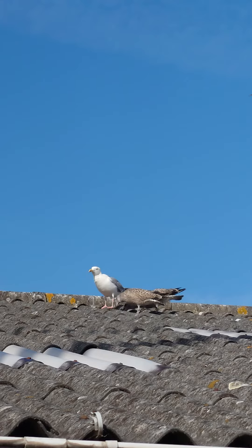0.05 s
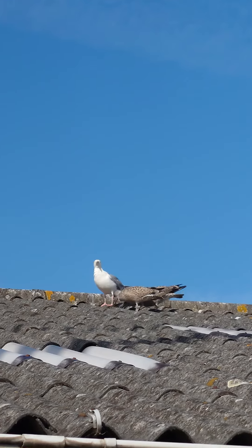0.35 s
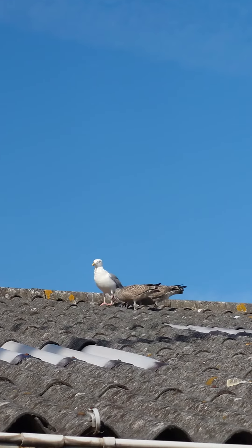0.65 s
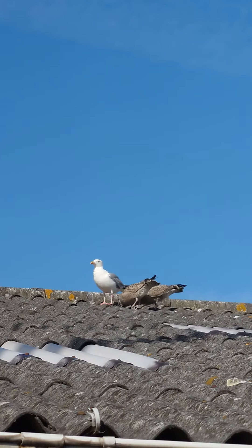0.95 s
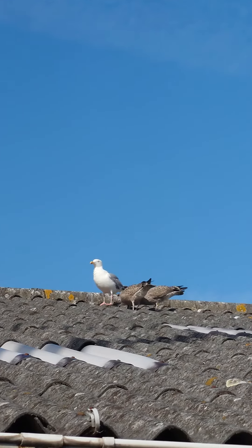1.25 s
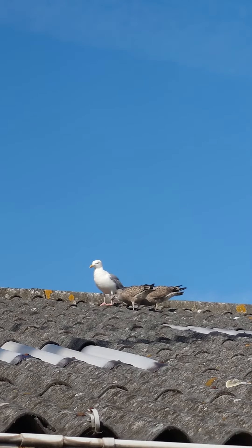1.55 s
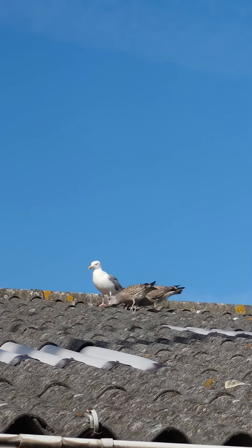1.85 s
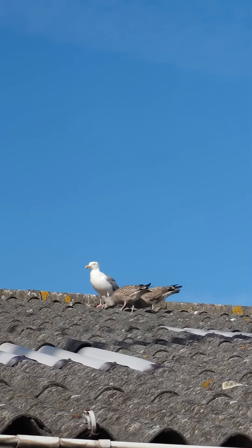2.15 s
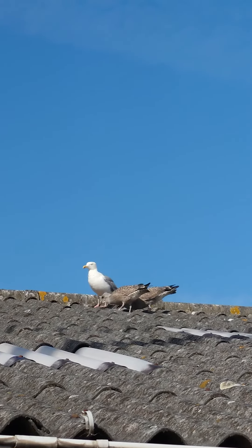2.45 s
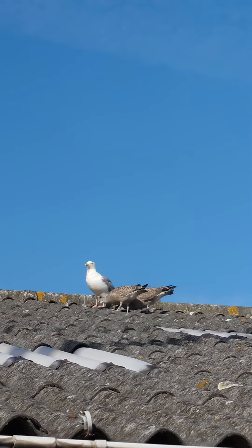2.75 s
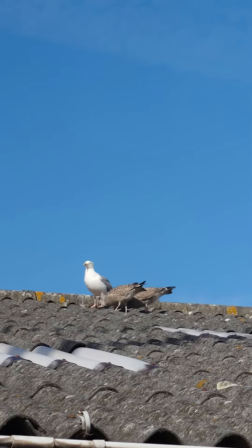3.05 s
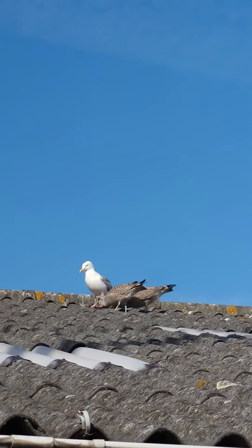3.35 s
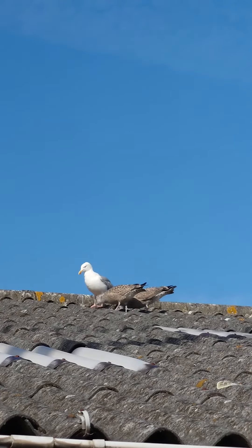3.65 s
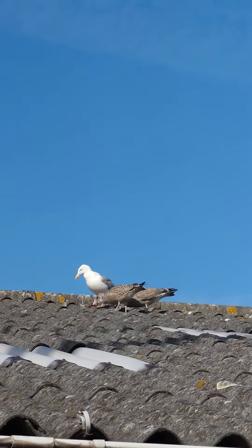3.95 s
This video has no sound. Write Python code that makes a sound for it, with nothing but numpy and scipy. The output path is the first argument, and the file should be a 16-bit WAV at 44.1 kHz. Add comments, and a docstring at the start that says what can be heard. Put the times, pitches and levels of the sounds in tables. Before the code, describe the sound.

Two young gulls beg with short, falling mews and squeals, often overlapping, over faint wind.

```python
"""Two young gulls beg on a roof, taking turns and often overlapping: one mews, one squeals, then wails.
Each call is a harmonic voice shaped by throat and beak: it rasps in, leaps to a clear note that
slides down, and breaks to a lower register. A smaller chick whistles far off.
Nearby houses throw the calls back; a light wind rumbles on the microphone over a faint hiss of air."""
import sys
import numpy as np
from scipy import signal
from scipy.fft import rfft, irfft
from scipy.io import wavfile
from scipy.ndimage import uniform_filter1d

SR = 44100
rng = np.random.default_rng(int(sys.argv[2]) if len(sys.argv) > 2 else 0)


def pcm_store(signal):
    """Save signal as 16-bit PCM."""
    levels = np.round(np.clip(np.atleast_2d(signal), -1, 1) * 32767)
    wavfile.write(sys.argv[1], SR, levels.astype(np.int16).T)


N = 176400

# Throat and beak response: freq_hz, gain_db
THROAT = [(180, -25.5), (400, -8.5), (650, -12.5), (900, -1), (1380, -2.5), (1750, -13), (2250, -17),
          (2800, -11), (3050, -7.5), (3400, -6), (4050, -9), (4500, -11), (5200, -18), (6400, -24.5),
          (7100, -42.5), (8000, -34.5), (9200, -56.5), (10200, -43), (11500, -49), (12600, -49),
          (15500, -58.5)]
BAND_LIMIT_HZ, ECHO_DULL_HZ = 15700, 1850


def gull_call(contour, gape, beak, start_s, leap_s, break_s, end_s, level_db, bright_db,
              treble_db=0, pitch_ratio=1, hold_s=0, slide_depth=1):
    """Harmonic voice through throat and beak; rasp adds jitter, half tones and puffs of air."""
    t = np.arange(start_s, end_s, 1 / SR)
    size = len(t)
    # Stage 0-1: wind-up, 1-2: clear note, 2-3: lower register.
    stage_times_s = [start_s, leap_s, leap_s + .002, leap_s + .003 + hold_s, break_s, end_s]
    stage = np.interp(t, stage_times_s, [0, 1, 1.02, 1.05, 2, 3])
    knots, *columns = np.transpose(contour)
    hz, envelope_db, overtone_db, rasp = (np.interp(stage, knots, column) for column in columns)
    overtone_db += bright_db
    # The top harmonics get out best while the beak is wide.
    open_stage, close_stage, open_db, scatter_rad = gape
    shut = np.clip(.5 + np.maximum(open_stage - stage, stage - close_stage) / .23, 0, 1)
    top_db = open_db + treble_db - 8.5 * shut
    slide = np.where((stage > 1) & (stage < 2), slide_depth, 1)
    hz = pitch_ratio * hz.max() * (hz / hz.max()) ** slide
    hz *= 1 + (.0014 + .022 * rasp) * waver(size, hz=263.1)
    phase = 2 * np.pi * np.cumsum(hz) / SR
    voice = np.zeros(size)
    for k in [.5, 1.5, 2.5, 3.5, 4.5, *range(1, 14)]:
        partial_hz = k * hz
        weight = amp(-10) * rasp if k % 1 else np.sqrt(1 - rasp ** 2)
        lift = (max(k - 1, 0) / 2) ** .34
        treble = 1 / (1 + (6140 / partial_hz) ** 10)
        beak_db = sum(db * np.exp(-((partial_hz - centre_hz) / 394) ** 2) for centre_hz, db in beak)
        lift_db = (overtone_db + 1.5 * waver(size, hz=60)) * lift
        gain = amp(read(THROAT, partial_hz) + beak_db + lift_db + top_db * treble)
        gain *= partial_hz < BAND_LIMIT_HZ
        hiss_rad = scatter_rad * treble ** 2 * waver(size, hz=400)
        voice += weight * gain * np.sqrt(2) * np.sin(k * phase + hiss_rad)
    breath = amp(-5) * rasp * air_puffs(size, overtone_db)
    fade = np.clip(np.minimum(t - start_s, end_s - t) / .0044, 0, 1)
    shimmer_db = 2 * waver(size, hz=69.3)
    sound = fade * amp(envelope_db + shimmer_db) * (voice + breath)
    add(sound, 0, creak())
    return amp(level_db) * sound


def mews():
    """First gull: each mew ends in two voices, the second sliding on down."""
    # stage, pitch_hz, level_db, overtone_db, rasp_share
    contour = [(0, 877.4, -12.5, -26, 0.81), (.5, 932.7, -9.5, -6, 0.96), (.95, 1050, -1.5, -15.5, 0.23),
               (1, 1325, -1.5, 2.5, 0.28), (1.17, 1401, 1, -0.5, 0.01), (1.32, 1316, -0.5, 3.5, 0.04),
               (1.58, 1252, -2, -1.5, 0.03), (1.85, 1217, -1.5, -6.5, 0.07), (1.98, 1191, -9, -8, 0.3),
               (2.04, 930, -4, -5.5, 0.5), (2.4, 864, -3, -18, 0.34), (3, 665, -15.5, -20.5, 0)]
    # open_stage, close_stage, treble_db, scatter_rad
    gape = (1.43, 1.75, -2.3, .2)
    # Beak peaks and dips: centre_hz, gain_db
    beak = [(2400, -6.5), (4800, 4.5), (5550, -6.5)]
    # start_s, leap_s, break_s, end_s, level_db, bright_db, treble_db, pitch_ratio
    calls = [(-.01, 0.032, .19, .212, -32.5, 4, -7, 1.004), (0.509, 0.545, 0.72, .74, -31, -1.5, 1.5, 0.98),
             (1.057, 1.099, 1.243, 1.282, -31.5, 2, -3, .995), (1.583, 1.629, 1.763, 1.805, -33, 1, -7, 1),
             (2.104, 2.142, 2.286, 2.331, -33, 2, -1, 1), (2.664, 2.703, 2.846, 2.885, -33.5, 2, 1, .995),
             (3.191, 3.227, 3.413, 3.413, -33.5, 2, 1, 0.99),
             (3.678, 3.713, 3.88, 3.885, -33.5, 4.5, 2.5, 1.011)]
    # delay_s, length_s, first_hz, middle_hz, last_hz, relative_db
    second_voice = (.005, .042, 1230, 1120, 820, -10)
    delay_s, *glide, relative_db = second_voice
    mix = np.zeros(N)
    for row in calls:
        start_s, _, break_s, _, level_db, *_ = row
        add(mix, start_s, gull_call(contour, gape, beak, *row))
        add(mix, break_s + delay_s, whistle(*glide, level_db + relative_db))
    return mix


def squeals():
    """Second gull, first calls: aimed at houses farther off, they come back late and dull."""
    # stage, pitch_hz, level_db, overtone_db, rasp_share
    contour = [(0, 836.8, -22, 2, .95), (.25, 1099, -12, -0.5, .9), (.35, 1202, -7, 0.5, .17),
               (.88, 1290, 2, -17.5, .02), (.97, 1342, -4, -16, .09), (1.05, 1458, -2.5, 0, .04),
               (1.95, 1335, 3, -13, 0.03), (2.03, 1171, 0.5, -2, .04), (2.4, 1121, 0, 2.5, .04),
               (2.8, 1050, -4.5, -0.5, .14), (3, 937, -15, 4.5, .45)]
    # open_stage, close_stage, treble_db, scatter_rad
    gape = (2.39, 3, 1.8, 0.81)
    # Beak peaks and dips: centre_hz, gain_db
    beak = [(2250, 3.5), (5750, -8.5), (6850, -22)]
    # start_s, leap_s, break_s, end_s, level_db, bright_db
    calls = [(-.07, 0.014, 0.034, 0.1, -26, 0), (0.208, 0.302, 0.32, 0.41, -26.5, 1),
             (.595, 0.649, .686, .763, -25.5, -0.5)]
    # delay_s, gain_db
    far_echoes = [(.6, -14), (.775, -25.5)]
    mix = np.zeros(N)
    for row in calls:
        add(mix, row[0], gull_call(contour, gape, beak, *row))
    dulled = signal.lfilter(*signal.butter(2, ECHO_DULL_HZ, fs=SR), mix)
    for delay_s, gain_db in far_echoes:
        add(mix, delay_s, amp(gain_db) * dulled)
    return mix


def wails():
    """Second gull, later calls: a briefly held top note, then a long slide."""
    # stage, pitch_hz, level_db, overtone_db, rasp_share
    contour = [(0, 894, -18.5, -8.5, 1), (.42, 1076, -6, -6.5, 1), (.53, 1193, -8.5, -2.5, 0.53),
               (.83, 1279, 3.5, -5, 0.055), (.97, 1315, -4.5, -22.5, 0.096), (1.02, 1476, -4.5, -5, 0.2),
               (1.18, 1386, 2, -6.5, 0.096), (1.35, 1269, 1, -2, 0.052), (1.57, 1190, -6, -0.5, 0.038),
               (1.8, 1120, -7, -4, 0.041), (1.98, 1081, -6, -21, 0.11), (2.07, 892.5, -6.5, -9, 0.38),
               (2.55, 808.4, -8, -40.5, 0.42), (3, 668, -16.5, -13, 1)]
    # open_stage, close_stage, treble_db, scatter_rad
    gape = (1.4, 1.75, 3, 1)
    # Beak peaks and dips: centre_hz, gain_db
    beak = [(2950, -2.5), (4400, -4.5), (6100, 0.5)]
    # start_s, leap_s, break_s, end_s, level_db, bright_db, hold_s, slide_depth
    calls = [(0.965, 1.021, 1.16, 1.21, -28, 0.5, .019, 0.94),
             (1.847, 1.897, 2.01, 2.08, -28, -.5, 0.0096, 0.98),
             (2.467, 2.528, 2.668, 2.725, -30, 0.5, 0.0018, 0.94),
             (3.327, 3.38, 3.494, 3.57, -31.5, -0.5, 0.0019, 0.97)]
    mix = np.zeros(N)
    for *row, hold_s, depth in calls:
        add(mix, row[0], gull_call(contour, gape, beak, *row, hold_s=hold_s, slide_depth=depth))
    return mix


def air_puffs(size, fizz_db, rattle_hz=370.2, split_hz=1750, top_hz=7000):
    """Rattling puffs of air coloured by the throat: a low body plus fizz."""
    cycles = np.cumsum(rattle_hz * (1 + .18 * waver(size, hz=100))) / SR
    puffs = evened((.14 + np.exp(-(cycles % 1) / .43)) * rng.standard_normal(size))
    fft_size = 16384
    hz = np.fft.rfftfreq(fft_size, 1 / SR)
    throat = evened(amp(read(THROAT, hz)) / np.hypot(1, (hz / top_hz) ** 3))
    spectrum = rfft(puffs, fft_size) * throat
    body = irfft(spectrum * (hz < split_hz))[:size]
    fizz = irfft(spectrum * (hz >= split_hz))[:size]
    return body + amp(fizz_db) * fizz


def creak(length_s=.028, snap_hz=342.4, band_hz=(1130, 5960)):
    """A short swelling run of sharp snaps as the voice catches."""
    t = np.arange(0, length_s, 1 / SR)
    cycles = np.cumsum(snap_hz * (1 + .22 * waver(len(t), snap_hz))) / SR
    swell = np.sin(np.pi * (t / length_s) ** 1.9) ** .5
    snaps = np.diff(np.floor(cycles), prepend=0) * swell
    band = signal.butter(4, band_hz, "bandpass", fs=SR, output="sos")
    lowpass = signal.butter(10, band_hz[1], fs=SR, output="sos")
    return amp(-25.5) * evened(signal.sosfilt(np.vstack([band, lowpass]), snaps))


def whistle(length_s, first_hz, middle_hz, last_hz, level_db):
    """A thin, slightly unsteady tone gliding through three pitches."""
    t = np.arange(0, length_s, 1 / SR)
    glide = np.polyfit([0, .5, 1], [first_hz, middle_hz, last_hz], 2)
    hz = np.polyval(glide, t / length_s) * (1 + .0055 * waver(len(t), hz=110))
    fade = np.clip(np.minimum(t, length_s - t) / .0028, 0, 1)
    shimmer_db = 4.7 * waver(len(t), hz=58)
    return amp(level_db + shimmer_db) * fade * np.sin(2 * np.pi * np.cumsum(hz) / SR)


def chick():
    """A distant chick's short, high whistles."""
    # start_s, length_s, first_hz, middle_hz, last_hz, level_db
    whistles = [(0.507, 0.047, 4522, 4600, 4620, -44.5), (1.429, 0.15, 4588, 4470, 4670, -55),
                (2.727, .12, 4820, 4670, 4710, -51.5), (3.807, 0.17, 4543, 4780, 4450, -54)]
    mix = np.zeros(N)
    for start_s, *row in whistles:
        add(mix, start_s, whistle(*row))
    return mix


def wall_echoes(t):
    """Stereo impulse response of the houses: each echo is a spike and a short smear."""
    # delay_s, gain_db
    echoes = [(.014, -9.5), (.031, -17), (.087, -17), (0.119, -16), (0.243, -29.5)]
    smear_s, skew_s = .002, .0008
    walls = np.zeros((2, len(t)))
    for delay_s, gain_db in echoes:
        smear = rng.standard_normal(walls.shape) * np.exp(-abs(t - delay_s) / smear_s) * (t > delay_s)
        walls += amp(gain_db) * smear / np.linalg.norm(smear[0])
        for channel in walls:
            add(channel, delay_s + skew_s * rng.uniform(-1, 1), amp([gain_db]))
    return walls


def diffuse_tail(size, rise_s=.0097):
    """Stereo impulse response of the yard: noise dying away band by band."""
    # freq_hz, t60_s, level_db
    yard = [(394, 0.85, -9), (1230, 1, -14), (2670, 1, -9), (4050, 0.98, -16), (6500, 0.78, -10),
            (13000, .35, -10.5)]
    hz, age_s, noise = signal.stft(rng.standard_normal((2, size)), SR, nperseg=256)
    decay = amp(-60 * age_s / read(yard, hz)[:, None]) * np.minimum(age_s / rise_s, 1)
    decay /= np.sqrt((decay ** 2).mean(1, keepdims=True) * size)
    gain = amp(read(yard, hz, column=2))[:, None]
    return signal.istft(noise * decay * gain, SR, nperseg=256)[1][:, :size]


def outdoors(birds):
    """Direct sound from the right, dulled wall echoes and a diffuse tail."""
    # freq_hz, left_minus_right_db, left_lead_rad
    direction = [(500, 3, -0.2), (1200, 0.5, -1.2), (2570, -16, -1.5), (3410, -8.5, 2.5), (3788, -2, -2),
                 (4930, -15.5, -2), (6500, -28, -8), (7560, -8, -1.87)]
    size, lead = SR, 256
    hz, t = np.fft.rfftfreq(size, 1 / SR), np.arange(size) / SR
    side = np.array([[.5], [-.5]])
    balance = amp(side * read(direction, hz))
    balance /= np.sqrt((balance ** 2).mean(0))
    direct = balance * np.exp(1j * side * read(direction, hz, column=2))
    walls = rfft(wall_echoes(t)) / np.hypot(1, hz / ECHO_DULL_HZ)
    response = direct + balance ** .5 * (walls + rfft(diffuse_tail(size)))
    impulse = np.roll(irfft(response, size), lead, 1)
    return signal.fftconvolve(birds[None], impulse, axes=1)[:, lead:lead + N]


def wind():
    """Light gusts rumbling on the microphone."""
    # time_s, level_db
    gusts = [(0, -63.5), (.9, -53), (1.401, -59), (2.102, -53.5), (2.9, -59.5), (4, -51.5)]
    # freq_hz, relative_db
    spectrum = [(27, -20), (36, 5.5), (48, -8), (105, -12.5), (150, -19), (2000, -63.5)]
    level_db = np.interp(np.arange(N) / SR, *np.transpose(gusts))
    return amp(level_db) * drifting_noise(spectrum, coherence=.69, patch_db=2)


def air():
    """Faint outdoor hiss."""
    # freq_hz, relative_db
    spectrum = [(20, -14.5), (200, -4), (450, .5), (1300, -7), (1800, -15), (3000, -17), (4300, -23),
                (6000, -29), (8000, -50), (15000, -51)]
    return amp(-59) * drifting_noise(spectrum, coherence=.73, patch_db=3)


def drifting_noise(spectrum, coherence, patch_db):
    """Stereo noise with drifting spectral patches, rms 1."""
    hz = np.fft.rfftfreq(4096, 1 / SR)
    left_re, left_im, own_re, own_im, patches = rng.standard_normal((N // 1024 + 5, len(hz), 5)).T
    patches = uniform_filter1d(patches, size=14, axis=0)
    patches = evened(uniform_filter1d(patches, size=5, axis=1))
    left = left_re + 1j * left_im
    right = coherence * left + np.sqrt(1 - coherence ** 2) * (own_re + 1j * own_im)
    frames = np.array([left, right]) * amp(read(spectrum, hz)[:, None] + patch_db * patches)
    return evened(signal.istft(frames, nperseg=4096, noverlap=3072)[1][:, :N])


def amp(db):
    """Decibels to gain."""
    return 10 ** (np.asarray(db) / 20)


def evened(x):
    """Scales to rms 1."""
    return x / np.sqrt(np.mean(x ** 2) + 1e-20)


def read(table, hz, column=1):
    """Interpolates a column on a log-frequency axis."""
    columns = np.transpose(table)
    return np.interp(np.log(hz + 1), np.log(columns[0] + 1), columns[column])


def add(mix, start_s, sound):
    """Mixes a sound in place, cropped to fit."""
    at = round(start_s * SR)
    sound = sound[max(-at, 0):]
    part = mix[max(at, 0):][:len(sound)]
    part += sound[:len(part)]


def waver(size, hz):
    """Smooth random motion up to hz, rms about 1."""
    steps = np.arange(size) * 2 * hz / SR
    return 1.2 * np.interp(steps, np.arange(1024), rng.standard_normal(1024))


def scene():
    """Two gulls and a chick among houses, over wind and air."""
    return outdoors(mews() + squeals() + wails() + chick()) + wind() + air()


def record(dry):
    """Steep low-pass at the band limit."""
    lowpass = signal.firwin(511, BAND_LIMIT_HZ, window=("kaiser", 9), fs=SR)
    return signal.oaconvolve(dry, lowpass[None], "same")


dry = scene()
out = record(dry)
pcm_store(out)
```